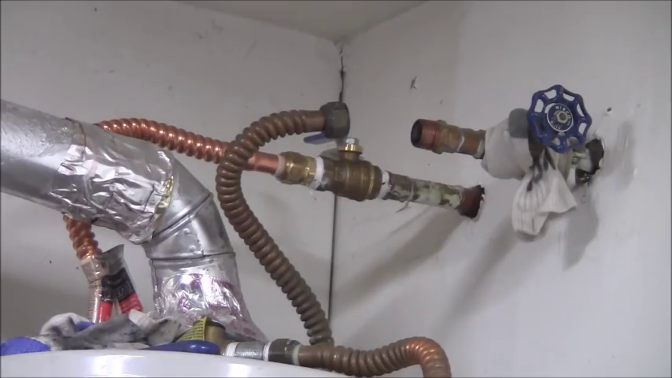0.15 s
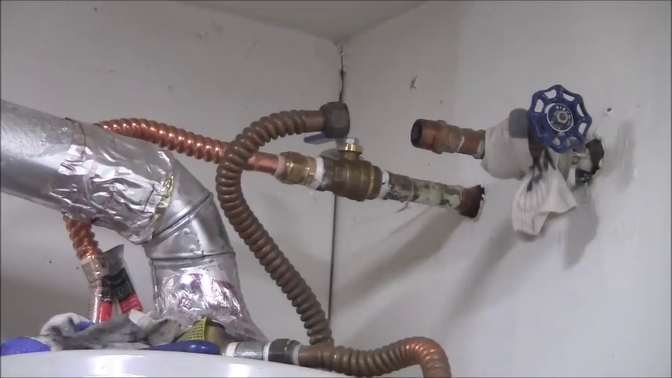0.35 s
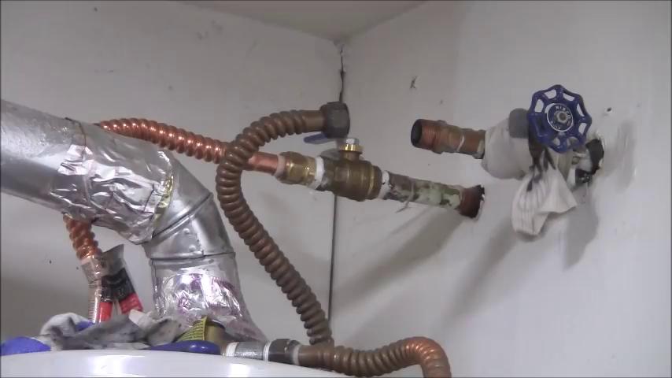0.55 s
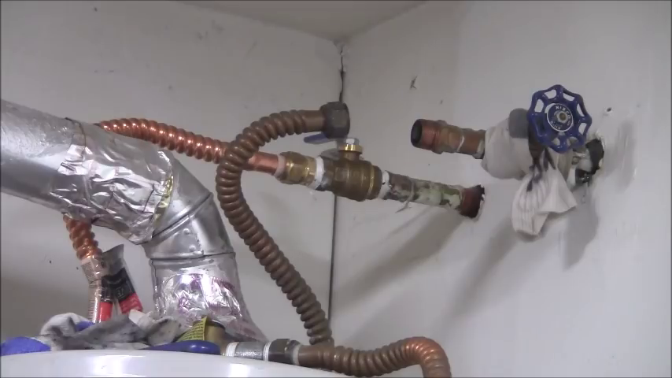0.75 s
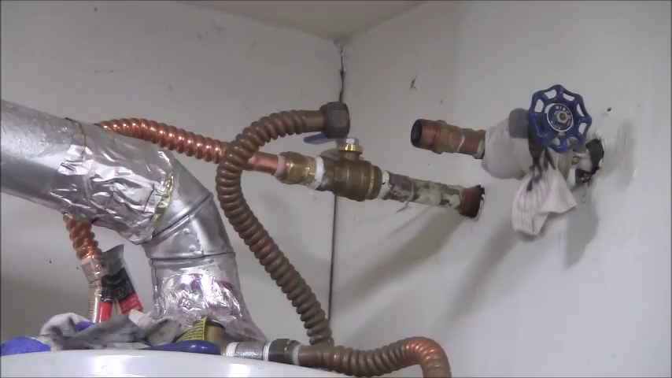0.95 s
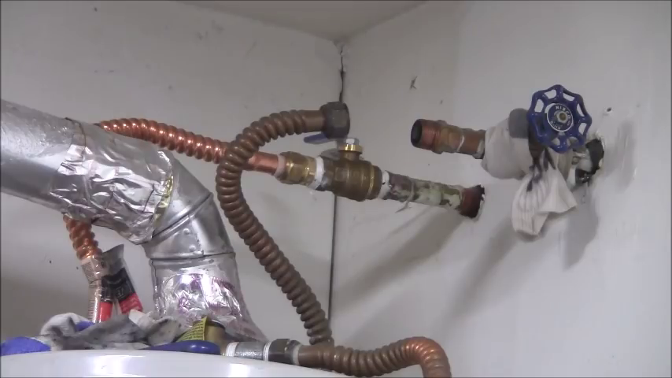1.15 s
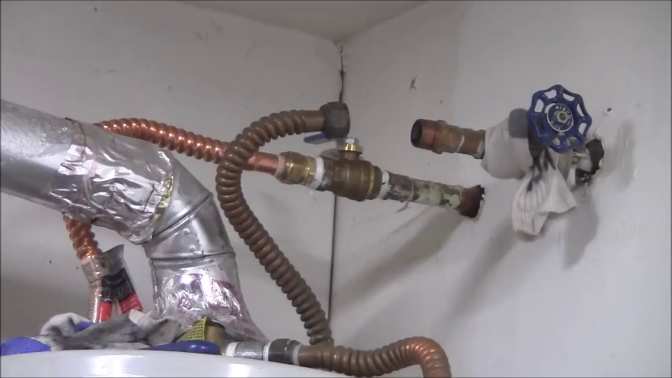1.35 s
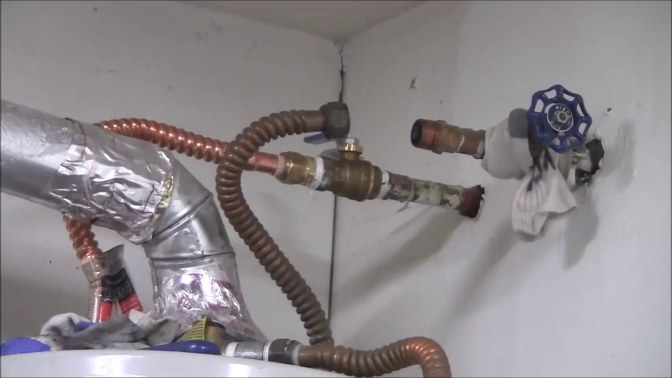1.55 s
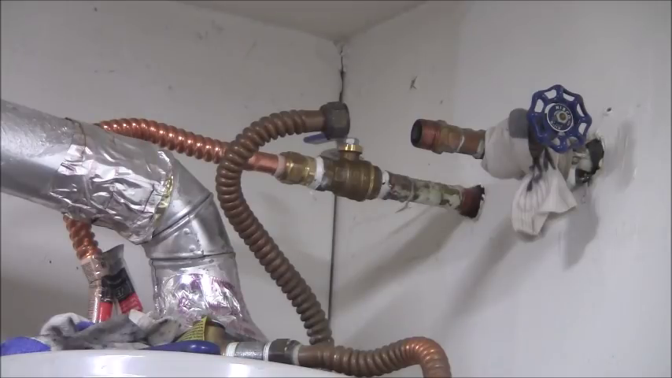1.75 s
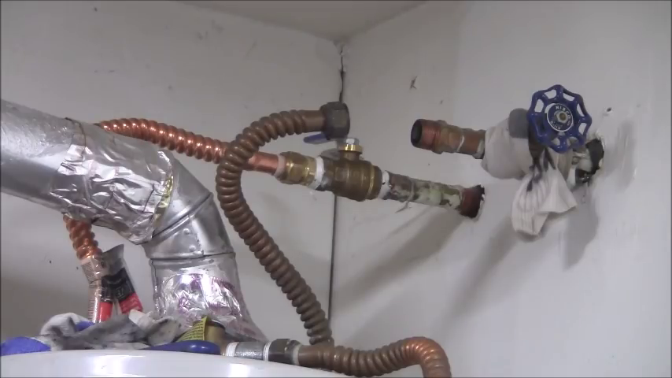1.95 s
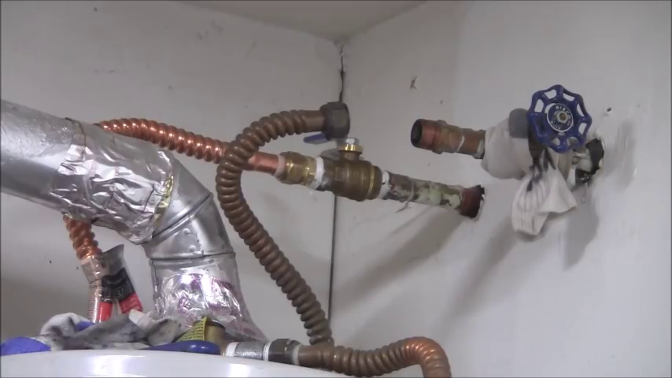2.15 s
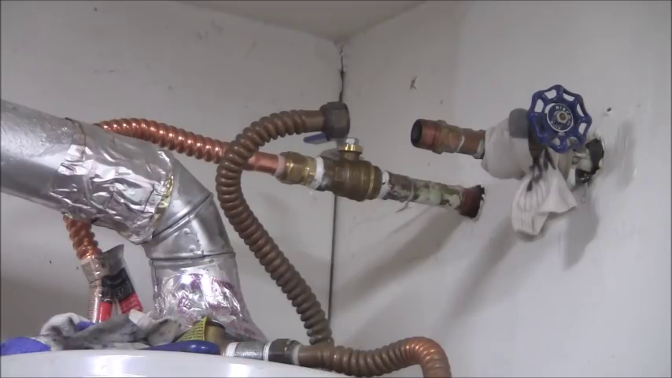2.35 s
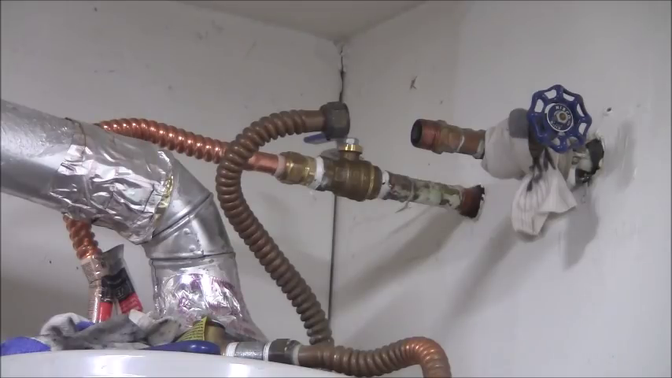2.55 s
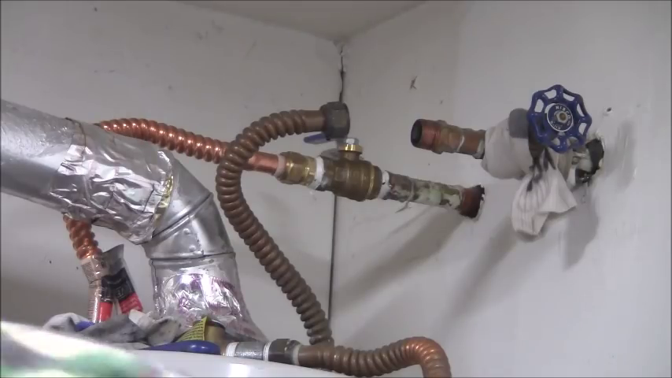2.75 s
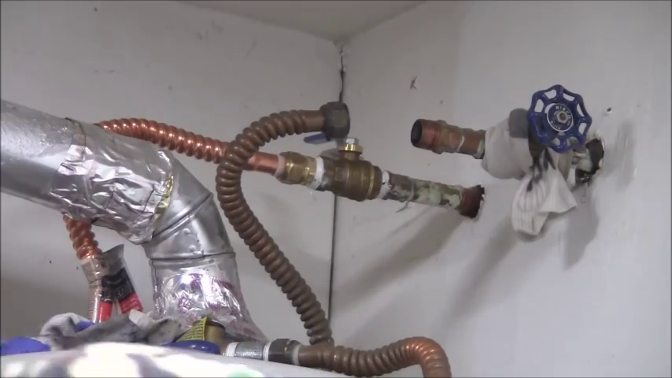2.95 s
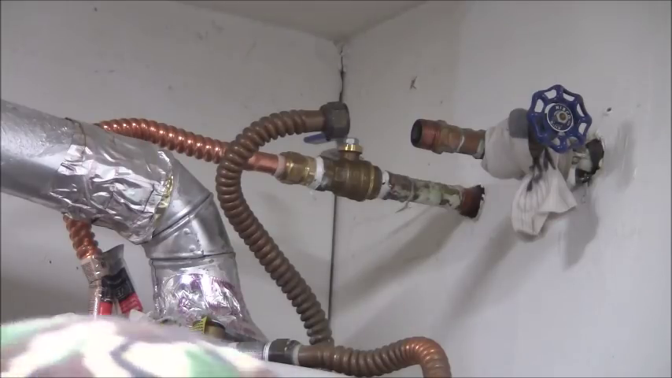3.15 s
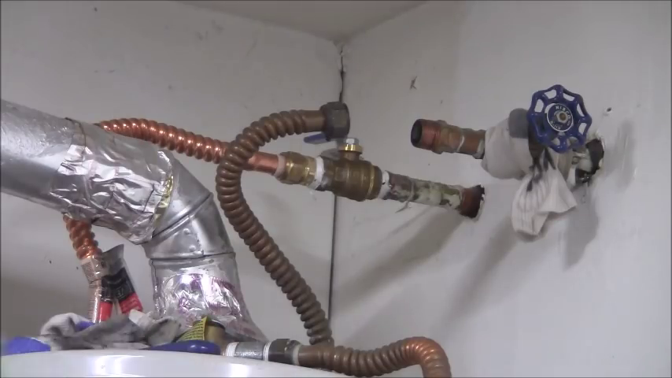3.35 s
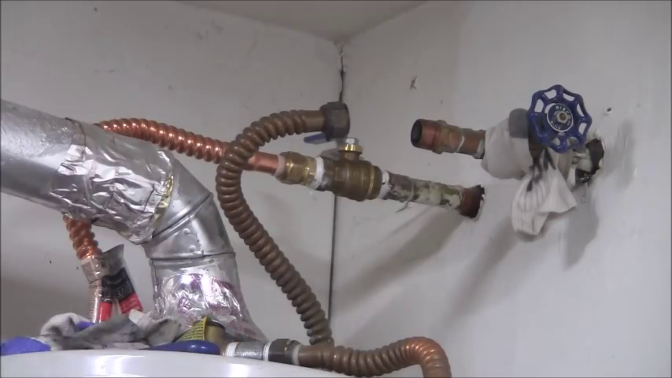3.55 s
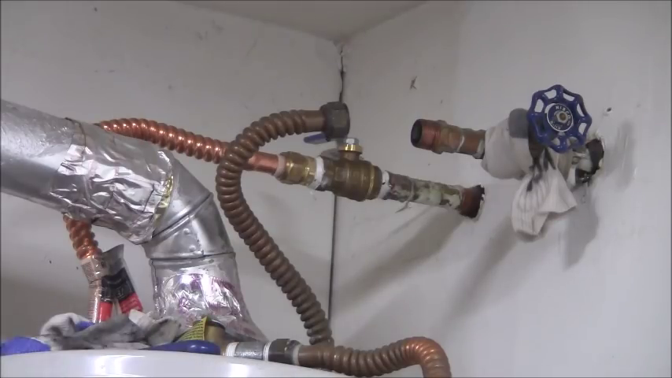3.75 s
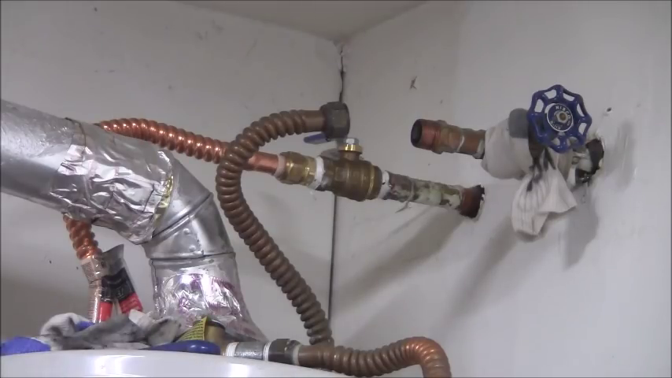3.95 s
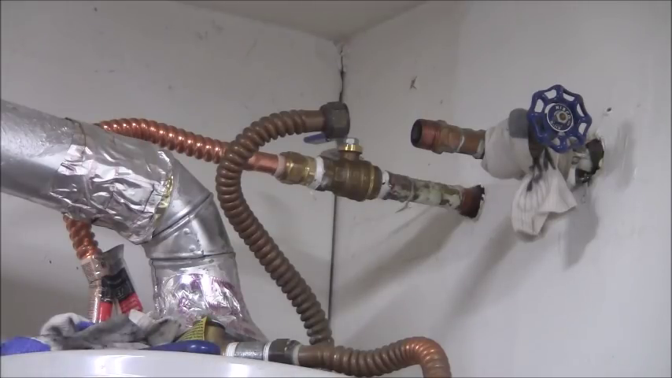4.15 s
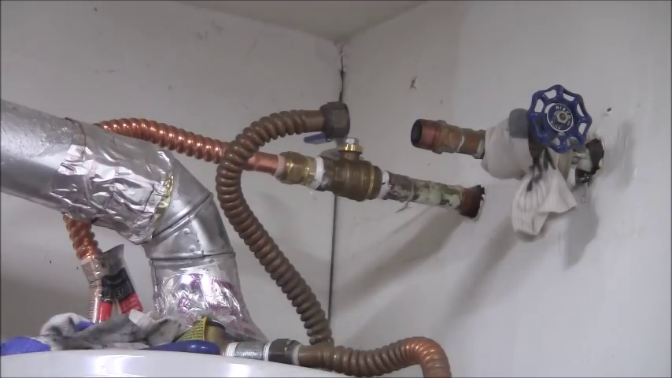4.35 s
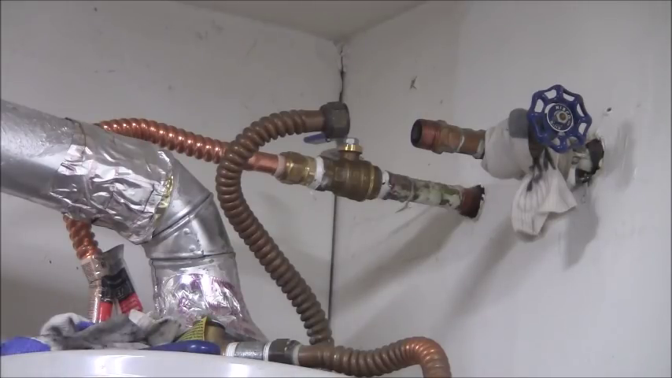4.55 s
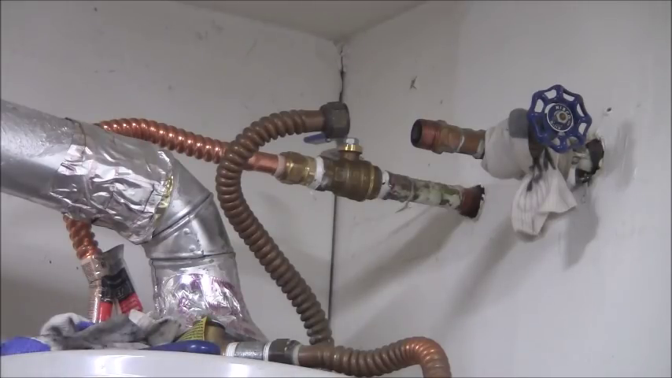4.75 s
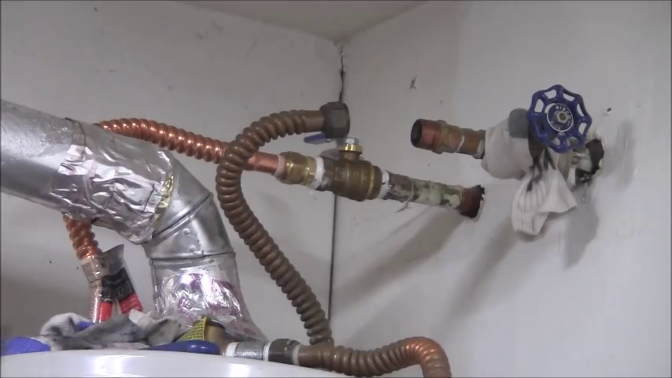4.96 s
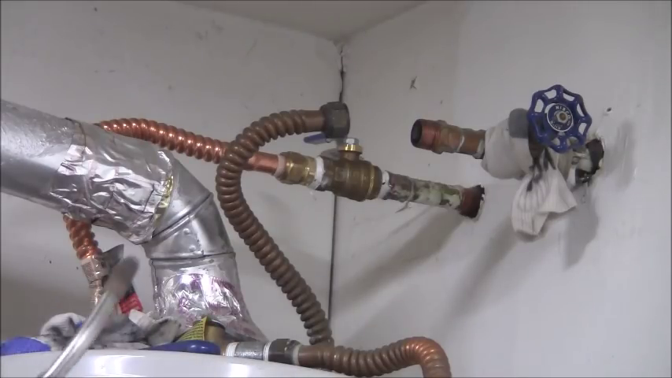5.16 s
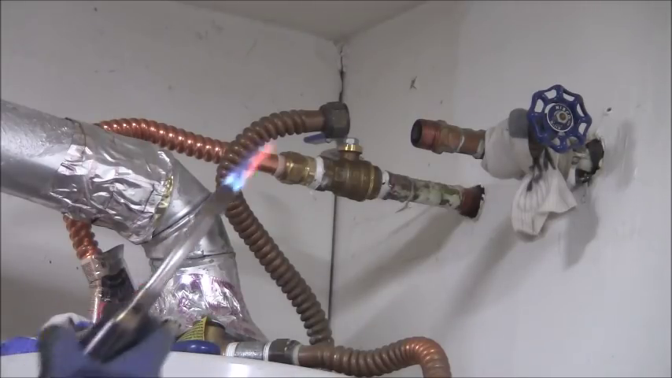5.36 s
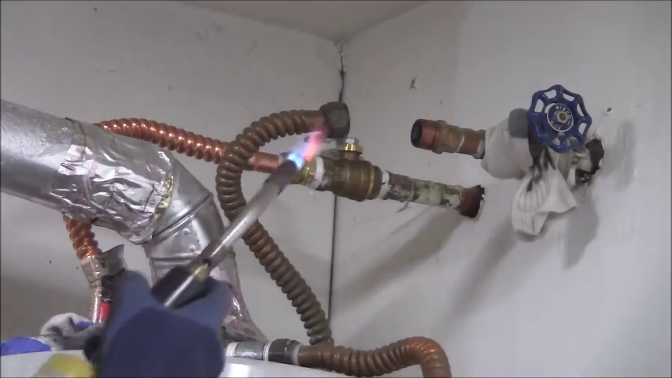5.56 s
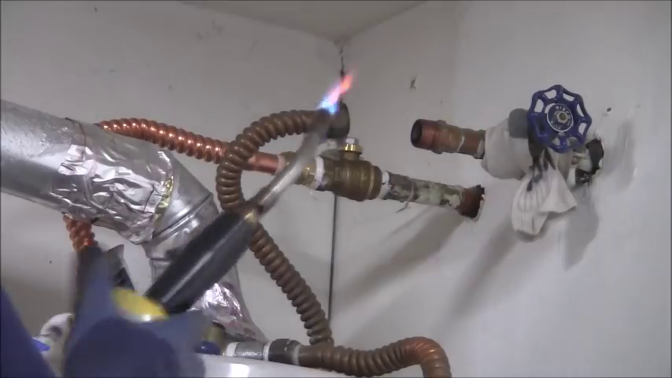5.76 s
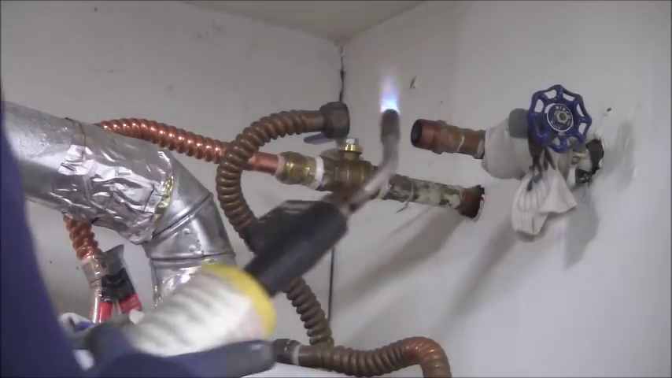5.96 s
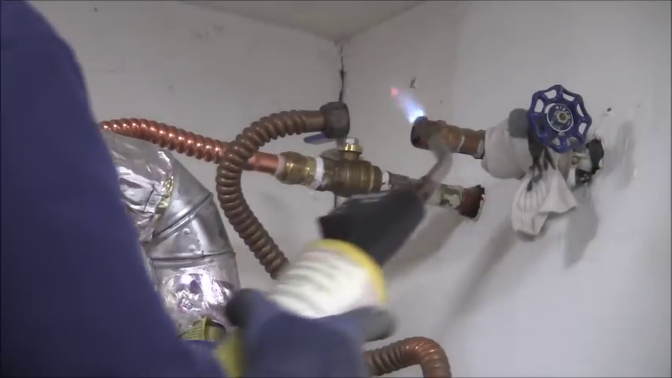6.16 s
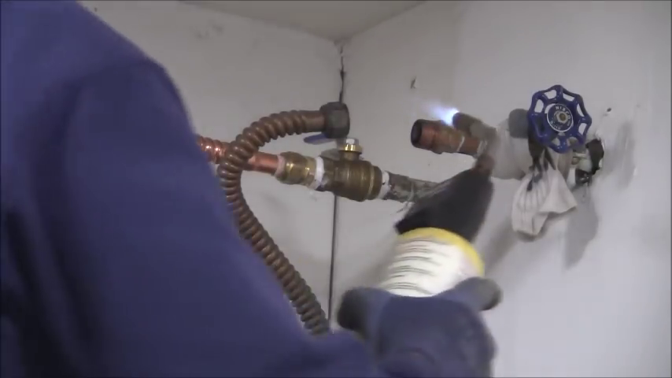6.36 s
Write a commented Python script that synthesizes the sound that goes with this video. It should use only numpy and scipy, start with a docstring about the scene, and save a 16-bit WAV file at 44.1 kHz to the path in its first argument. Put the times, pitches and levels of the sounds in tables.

```python
"""Clothes rustle over quiet air and hiss in a bare cupboard as a plumber shifts about and knocks tools.
A hollow gas cylinder is dragged in scraping jerks, a torch is tapped and its valve squeaks and hisses.
An igniter snaps: the flame pops alight with a low whump and roars while the torch moves to a copper pipe
near the wall. Noise and random clicks, shaped by spectra and resonances, make all but the squeak: a
wavering sine. A decaying noise tail adds the cupboard, and shortening delays add the walls near the flame."""
import sys
import numpy as np
from scipy import signal
from scipy.fft import rfft, irfft, next_fast_len
from scipy.io import wavfile

SR = 44100
rng = np.random.default_rng(int(sys.argv[2]) if len(sys.argv) > 2 else 0)


def master_out(mix):
    """Clip the mix to full scale and print it as 16-bit PCM to the path in sys.argv[1]."""
    frames = np.transpose(np.atleast_2d(mix))
    ceiling = np.clip(frames, -1, 1)
    pcm = np.round(ceiling * 32767).astype(np.int16)
    wavfile.write(sys.argv[1], SR, pcm)


N = 281799


def from_db(db):
    """Decibels to gain."""
    return 10 ** (np.asarray(db) / 20)


def rms_one(x):
    """Scale to rms 1."""
    return x / np.sqrt(np.mean(x ** 2) + 1e-20)


def in_time(rows):
    """Turn table columns into curves with one value a sample; the first column is time in seconds."""
    s, *columns = np.transpose(rows)
    return [np.interp(np.arange(N) / SR, s, column) for column in columns]


def at_hz(points, hz):
    """Read a spectrum in dB on a log frequency axis."""
    point_hz, point_db = np.array(points).T
    return np.interp(np.log(hz), np.log(point_hz), point_db)


def colour(x, *spectra):
    """Filter noise or clicks by the sum of spectra in dB; rms 1."""
    size = next_fast_len(N)
    hz = np.maximum(np.fft.rfftfreq(size, 1 / SR), 1)
    gain = from_db(sum(at_hz(spectrum, hz) for spectrum in spectra))
    return rms_one(irfft(rfft(x, size) * gain, size)[:N])


def drift(rate_hz):
    """Slow random wander of rms 1: noise through two equal poles, drawn every 40 samples."""
    r = np.exp(-2 * np.pi * rate_hz * 40 / SR)
    noise = rng.standard_normal(N // 40 + 2002)
    slow = signal.lfilter([1], [1, -2 * r, r * r], noise)[2000:]  # skip the filter's start
    return np.interp(np.arange(N) / 40, np.arange(len(slow)), rms_one(slow))


def resonate(x, hz, width_hz):
    """One damped resonance, about gain 1 at its peak."""
    r = np.exp(-np.pi * max(width_hz, 10) / SR)
    feed = np.array([1, 0, -1]) * (1 - r * r) / 2
    return signal.lfilter(feed, [1, -2 * r * np.cos(2 * np.pi * hz / SR), r * r], x)


def ring(x, modes):
    """Modes struck in parallel, signs alternating; rms 1."""
    total = 0
    for k, (hz, width_hz, db) in enumerate(modes):
        total = total + (-1) ** k * from_db(db) * resonate(x, hz, width_hz)
    return rms_one(total)


def grains(per_s, spread_db):
    """Random clicks of either sign and uneven size."""
    sizes_db = spread_db * np.minimum(rng.exponential(1, N), 4)
    sizes = from_db(sizes_db) * rng.choice([-1, 1], N)
    return sizes * (rng.random(N) < per_s / SR)


def swells(s, swell_s, hold_s, fade_s, db):
    """Gain of events that change 10 dB in each swell or fade time around a hold; their powers add."""
    t = np.arange(0, N + 32, 32)[:, None] / SR
    before = (s - t) / np.maximum(swell_s, 1e-4)  # a negative swell time is a sudden start
    after = (t - s - hold_s) / np.maximum(fade_s, 1e-4)
    down = np.maximum(np.maximum(before, after), 0)
    gain = np.sqrt(np.sum(from_db(db - 10 * down) ** 2, axis=1))
    return np.interp(np.arange(N) / SR, t[:, 0], gain)


def rattle(contacts, s, t60_s):
    """A firm first contact, then a dying rattle: start sample, contacts, envelope."""
    i, t = round(s * SR), np.arange(SR // 2) / SR
    dying = from_db(-60 * t / max(t60_s, .01))
    blows = contacts[i:i + len(t)] * dying
    blows[0] += 8.0
    return i, blows, dying


def later(x, ms):
    """Read the sound some milliseconds late; the delay may change in time."""
    return np.interp(np.arange(N) - ms * SR / 1000, np.arange(N), x)


def noise_band(centre_hz, width_hz):
    """Slow noise on a gliding carrier: a band of noise with a moving centre; rms 1."""
    noise = rng.standard_normal((2, len(centre_hz)))
    slow = signal.lfilter(*signal.butter(2, width_hz / 2, fs=SR), noise)
    phase = 2 * np.pi * np.cumsum(centre_hz) / SR
    return rms_one(slow[0] * np.cos(phase) + slow[1] * np.sin(phase))


# All spectra below give relative shape only.
# quiet air and hiss: frequency_hz, level_db (per Hz)
AIR_SPECTRUM = [(15, -43), (25, -5.5), (107, 5), (187, 2), (250, 5), (326, -1.5), (684, -4), (1100, -17),
                (1400, -18), (1510, -22), (1820, -17), (4370, -17.5), (9410, -18), (14000, -32.5)]
# stereo difference of the air, shape against the mid: frequency_hz, side_db
AIR_SIDE_SHAPE = [(60, -16), (110, -15.5), (200, -11.5), (370, -3), (670, -4), (1220, 5.5), (2230, -3.5),
                  (4060, -5.5), (7420, -11), (13600, -21)]
AIR_DB = -53


def room_tone():
    """Quiet air and microphone hiss: steady noise with a separate noise for the stereo side."""
    mid, side = rng.standard_normal((2, N))
    mid = colour(mid, AIR_SPECTRUM)
    side = from_db(-5.0) * colour(side, AIR_SPECTRUM, AIR_SIDE_SHAPE)
    return from_db(AIR_DB) * (mid + side * [[1], [-1]])


# soft body of rubbed cloth: frequency_hz, level_db (per Hz)
CLOTH_BODY_SPECTRUM = [(150, -13), (300, -0.5), (700, -1.5), (1500, -3), (2500, -14), (5000, -30)]
# crisp surface snaps, also the colour of grit: frequency_hz, level_db (per Hz)
CRISP_SPECTRUM = [(1180, -21), (2000, 1), (2350, 0.5), (4370, -1.5), (5670, 0), (8110, -1), (9860, -2),
                  (14000, -31)]
# clothes and gloves rub; the short one at 2.588 s is a tick leading into a tool knock:
# peak_s, swell_s, fade_s (both per 10 dB), body_db, crisp_db
RUBS_AND_TICK = [(0.101, 0.015, 0.015, -57, -56), (0.171, -0.1, 0.024, -64, -56.5),
                 (0.36, -0.1, 0.072, -64, -51), (0.4, 0.013, 0.058, -50.5, -64),
                 (0.5, -0.03, 0.084, -60, -60), (0.64, 0.046, 0.046, -57, -52),
                 (0.765, 0.038, 0.086, -53.5, -52), (0.99, .09, 0.16, -57.5, -56.5),
                 (1.13, -0.3, 0.57, -63, -56.5), (1.28, 0.013, 0.016, -45, -57),
                 (1.41, 0.042, .06, -55, -60), (1.455, 0.043, 0.028, -46.5, -48),
                 (1.5, -0.14, 0.31, -63, -61), (1.69, 0.055, .06, -59, -50),
                 (1.82, 0.068, 0.067, -48.5, -46.5), (1.92, 0.019, 0.21, -57, -56.5),
                 (2.04, 0.0076, 0.025, -57, -48.5), (2.105, 0.0083, 0.049, -62, -50),
                 (2.3, 0.01, 0.084, -53.5, -59), (2.405, 0.005, 0.16, -57, -60.5),
                 (2.54, 0.033, 0.22, -76, -69), (2.588, .008, .02, -43, -46),
                 (2.99, 0.055, 0.057, -53, -64), (3.34, 0.15, 0.013, -53, -70),
                 (3.491, 0.084, 0.011, -49.5, -59), (3.55, 0.045, 0.027, -50.5, -68),
                 (3.66, 0.022, 0.19, -55.5, -58), (3.862, 0.005, 0.014, -53, -68),
                 (3.95, 0.027, 0.15, -62, -66), (4.12, 0.04, 0.098, -52.5, -56.5),
                 (4.38, 0.013, 0.3, -66, -61), (4.62, 0.03, 0.021, -46.5, -61),
                 (4.76, 0.038, 0.045, -48, -64), (4.875, 0.035, 0.025, -52, -65)]
STIR_BODY_DB, STIR_CRISP_DB = -64.5, -71   # slight movement between the rubs


def rustle():
    """Fibres slip in dense tiny snaps, a soft body and a crisp surface; one short burst is a knock's tick."""
    s, swell_s, fade_s, body_db, crisp_db = np.transpose(RUBS_AND_TICK)
    body = swells(s, swell_s, 0, fade_s, body_db) + from_db(STIR_BODY_DB)
    crisp = swells(s, swell_s, 0, fade_s, crisp_db) + from_db(STIR_CRISP_DB)
    snaps = grains(2500.0, spread_db=0.5)
    return body * colour(snaps, CLOTH_BODY_SPECTRUM) + crisp * colour(snaps, CRISP_SPECTRUM)


# flat contact: frequency_hz, level_db (per Hz)
SLAP_SPECTRUM = [(300, -56), (700, 7.5), (1500, 7.5), (2800, 0.5), (5000, -21)]
# hard contact: frequency_hz, level_db (per Hz)
CRACK_SPECTRUM = [(1500, -21), (3000, -4), (4500, -6), (7500, -0.5), (10500, -2.5), (14000, -51)]
# knocks: start_s, strength_db, ring_hz, thud_db, slap_db, crack_db (last three
# against the ring), rattle_t60_s
TOOL_KNOCKS = [(0.092, -47, 372, -23, 1, -18, .089), (0.355, -52.5, 291, -18, 5, -5, 0.086),
               (0.388, -45.5, 497, -14, 3.5, -13, 0.064), (0.849, -48.5, 1270, -27, -8, -5, .088),
               (0.962, -50, 420, -1, 2, -2, .08), (1.011, -48.5, 1170, -21, -6, -4, .053),
               (1.126, -52, 1130, -26, 10.5, 4, 0.073), (1.175, -52.5, 280, -20, 5, 2.5, 0.073),
               (1.275, -53, 595, -20, -14, -13, .1), (1.45, -42, 1410, -24, -9, -23, .11),
               (2.035, -49, 2210, -13, 3.5, -16, 0.17), (2.098, -46.5, 1930, -9, 2, 0, 0.07),
               (2.291, -44, 244, 2, -6, -9, 0.049), (2.397, -38, 390, -14, -30, -17, 0.12),
               (2.593, -37, 365, -27, 8, 3, 0.093), (3.008, -41, 280, -1.5, -1.5, -3, 0.48),
               (3.109, -31.5, 490, -1.5, 1.5, -3.5, 0.22), (3.196, -24.5, 400, -34, -11.5, -13.5, 0.18),
               (3.23, -33.5, 486, 1.5, -36, 8, 0.026), (3.279, -45, 514, 5, 5.5, -1, 0.057),
               (3.441, -45, 255, -4, -4.5, -9.5, .12), (3.546, -41.5, 416, -9, -16, -22, 0.074),
               (3.673, -52, 370, -24, 5.5, 15.5, .15), (3.86, -43, 348, -27, -23, -42, 0.15),
               (4.075, -46, 380, -18, -3.5, -13, 0.24), (4.747, -41.5, 1330, -24, -28, -26, 0.15),
               (4.955, -44, 411, -29, 7.5, -6, 0.17)]
# the igniter snaps: columns as for a knock
IGNITER_SNAP = (5.233, -14.5, 315, -7.5, -6, -4, 0.06)
RING_DAMPING = 0.77   # width of the ring over its pitch


def knocks():
    """Each knock, and the igniter, sounds a hollow ring, a low thud, a flat slap and a bright crack."""
    out, contacts = np.zeros(N), rms_one(grains(4000.0, spread_db=3.5))
    flat, bright = colour(contacts, SLAP_SPECTRUM), colour(contacts, CRACK_SPECTRUM)
    for s, strength_db, ring_hz, thud_db, slap_db, crack_db, t60_s in TOOL_KNOCKS + [IGNITER_SNAP]:
        i, blows, dying = rattle(contacts, s, t60_s)
        span = slice(i, i + len(blows))
        width_hz = ring_hz * RING_DAMPING
        # the roots make up for the energy that a narrow resonance takes away
        hollow = resonate(resonate(blows, ring_hz, width_hz), ring_hz, width_hz) * np.sqrt(SR / width_hz)
        thud = resonate(resonate(blows, 180, 210), 156, 130.0) * np.sqrt(SR / 150)
        slap = from_db(slap_db) * flat[span] * dying
        crack = from_db(crack_db) * bright[span] * dying
        out[span] += from_db(strength_db) * (hollow + from_db(thud_db) * thud + slap + crack)
    return out


# modes of the hollow gas cylinder: pitch_hz, width_hz, level_db
CYLINDER_MODES = [(734, 200, -10.5), (940, 76, 1), (1091, 60, -1), (1520, 120, -16), (1840, 220, -13.5),
                  (2110, 110, -13), (2250, 160, -16)]
# it is dragged over a hard top in jerks: start_s, hold_s, level_db
DRAG_JERKS = [(3.027, 0.019, -16.5), (3.052, 0.053, -25.5), (3.119, 0.016, -22.5), (3.221, .01, -30)]
# grit under it scratches: peak_s, swell_s, fade_s (both per 10 dB), level_db
GRIT_SCRATCHES = [(3.028, 0.0005, 0.015, -29.5), (3.075, 0.017, 0.07, -41), (3.106, .005, 0.005, -36),
                  (3.145, .003, .008, -38), (3.158, 0.0072, 0.01, -29), (3.2, .005, 0.005, -43)]
JERK_SWELL_S, JERK_FADE_S = 0.0012, 0.0076


def cylinder():
    """Stick-slip jolts ring the shell; grit scratches in sparse snaps."""
    s, hold_s, db = np.transpose(DRAG_JERKS)
    jerk_gain = swells(s, JERK_SWELL_S, hold_s, JERK_FADE_S, db)
    s, swell_s, fade_s, db = np.transpose(GRIT_SCRATCHES)
    grit_gain = swells(s, swell_s, 0, fade_s, db)
    jolts = signal.lfilter(*signal.butter(2, 1500, fs=SR), grains(4000.0, spread_db=3.0))
    grit = colour(grains(1500.0, spread_db=-3.5), CRISP_SPECTRUM)
    return jerk_gain * ring(jolts, CYLINDER_MODES) + grit_gain * grit


# metal modes of the torch: pitch_hz, width_hz, level_db
TORCH_MODES = [(478, 210, 4.5), (766, 150, 0), (1020, 110, 10.5), (1870, 370, -6), (2230, 180, -38),
               (2650, 88, 1.5), (3650, 130, -13.5), (4800, 70, -5.5), (5860, 80, -24), (7700, 130, -14),
               (7620, 79, -27), (8600, 190, -17)]
# loose parts: frequency_hz, level_db (per Hz)
CLATTER_SPECTRUM = [(200, -22), (450, -8), (1000, -2.5), (2200, -3), (4000, -12.5), (7500, -15),
                    (10500, -18), (14000, -60)]
# taps on the torch: start_s, ring_db, brightness_db (per octave above 1 kHz), clatter_db, rattle_t60_s
TORCH_TAPS = [(4.4, -38.5, 4.5, -22, 0.069), (4.408, -47, -7, -22.5, 0.087), (4.43, -44.5, -8, -33, 0.21),
              (4.508, -70, 11, -34.5, 0.12), (4.521, -53, 8, -37.5, 0.2)]


def torch():
    """Taps ring the same metal modes, a harder contact favours the high ones; loose parts clatter along."""
    out, contacts = np.zeros(N), rms_one(grains(6000.0, spread_db=2.0))
    loose = colour(contacts, CLATTER_SPECTRUM)
    for s, ring_db, bright_db, clatter_db, t60_s in TORCH_TAPS:
        i, blows, dying = rattle(contacts, s, t60_s)
        span = slice(i, i + len(blows))
        modes = [(hz, width_hz, db + bright_db * np.log2(hz / 1000)) for hz, width_hz, db in TORCH_MODES]
        clatter = from_db(clatter_db) * loose[span] * dying
        out[span] += from_db(ring_db) * ring(blows, modes) + clatter
    return out


# valve spindle squeaks: start_s, hold_s, pitch_hz, level_db
VALVE_SQUEAKS = [(4.53, 0.061, 1168, -40), (4.623, 0.036, 1159, -42.5), (4.7, 0.029, 1157, -52),
                 (4.76, .01, 1165, -64), (4.84, 0.034, 1156, -48.5)]
SQUEAK_SWELL_S, SQUEAK_FADE_S = .015, 0.021


def valve():
    """The spindle sticks and slips at one mode of the metal: a sine wavering in pitch and level."""
    s, hold_s, hz, db = np.transpose(VALVE_SQUEAKS)
    pitch_hz = np.interp(np.arange(N) / SR, s + hold_s / 2, hz)
    phase = 2 * np.pi * np.cumsum(pitch_hz + 4 * drift(25)) / SR
    gain = swells(s, SQUEAK_SWELL_S, hold_s, SQUEAK_FADE_S, db) * from_db(1.5 * drift(20))
    return np.sqrt(2) * gain * np.sin(phase)


# gas jet: frequency_hz, level_db (per Hz)
JET_SPECTRUM = [(150, -39), (250, -13), (813, -3), (978, 3), (1390, -11.5), (2160, -9), (2690, -9),
                (4760, -13), (7020, -12.5), (9830, 0.5), (14000, -28)]
# burner tube resonances: pitch_hz, width_hz, level_db (per 100 Hz of width)
TUBE_MODES = [(1050, 140, -5), (2147, 42, 5), (3410, 52, 0), (4750, 210, -5), (5560, 250, -3),
              (6180, 220, -6)]
GAS_OPEN_S, GAS_FULL_S = 4.875, 4.95   # valve opens, full flow reached
GAS_SWELL_S, GAS_DB = 0.081, -41.5   # swell time per 10 dB, level of the jet


def gas():
    """Smooth jet noise blows the pipe modes of the burner tube, each wavering in level."""
    jet, modes = rng.standard_normal(N), 0
    for hz, width_hz, db in TUBE_MODES:
        gain = from_db(db + 2.0 * drift(12)) * np.sqrt(width_hz / 100)
        modes = modes + gain * rms_one(resonate(jet, hz, width_hz))
    opening = np.clip((np.arange(N) / SR - GAS_OPEN_S) / .015, 0, 1)
    flow = swells(GAS_FULL_S, GAS_SWELL_S, N / SR, 1, GAS_DB) * opening  # held to the end
    return flow * (colour(jet, JET_SPECTRUM) + from_db(-6.5) * rms_one(modes))


# turbulent roar: frequency_hz, level_db (per Hz)
ROAR_SPECTRUM = [(29, -58), (50, -45), (141, -24), (184, -25), (256, -15.5), (539, -11), (598, -11),
                 (867, -11.5), (1450, -11), (1860, -14.5), (3610, -20.5), (3920, -23), (7000, -36),
                 (9100, -42), (15400, -120)]
# bright jet edge: frequency_hz, level_db (per Hz)
EDGE_SPECTRUM = [(2650, -12.5), (4500, 1.5), (5440, -6.5), (7030, -4), (7660, -2), (10000, -3.5),
                 (13000, -24), (14000, -34)]
# flame over time: time_s, flame_db, hot_tube_hz, hot_tube_db (against the flame)
FLAME_COURSE = [(5.236, -11, 1290, 3), (5.252, -8.5, 1347, -9), (5.424, -11, 1449, -7.5),
                (5.65, -10.5, 1486, -6), (5.88, -10, 1578, -12), (6.168, -11, 1330, -11.5),
                (6.184, -9.5, 1290, -6), (6.27, -11, 1495, -8.5), (6.39, -11.5, 1532, -3.5)]
# echo off the nearest wall as the torch closes in: time_s, delay_ms
WALL_ECHO_COURSE = [(5.25, 1.2), (5.45, .95), (5.75, 0.79), (6.0, 0.59), (6.2, 0.619), (6.39, 0.6)]
LIT_S, WALL_ECHO_DB, TUBE_WIDTH_HZ = 5.234, -14, 230
EDGE_DB, FLASH_DB, FLASH_S = -12.5, 16, 0.006   # the edge flashes up at ignition; the extra dB fall by 1/e
WHUMP_DB, WHUMP_HZ, WHUMP_T60_S = -15, 246, 0.28
RUMBLE_DB, RUMBLE_HZ, RUMBLE_T60_S = -37, 76.4, 0.88   # a deep rumble outlasts the whump


def flame():
    """Turbulent burning: roar, bright edge and hot tube resonance, shifting echoes, a whump at ignition."""
    flame_db, tube_hz, tube_db = in_time(FLAME_COURSE)
    t = np.arange(N) / SR - LIT_S
    lit_s = np.maximum(t, 0)
    edge_db = EDGE_DB + FLASH_DB * np.exp(-lit_s / FLASH_S)
    roar = colour(rng.standard_normal(N), ROAR_SPECTRUM)
    edge = colour(rng.standard_normal(N), EDGE_SPECTRUM)
    burn = from_db(drift(29)) * roar + from_db(edge_db + 1.2 * drift(30)) * edge
    # paths by way of the walls shorten as the torch moves into the corner: start delay, share lost a second
    for ms, pace in rng.uniform([2, -.35], [14, -.1], (7, 2)):
        reflected = signal.lfilter(*signal.butter(1, 500, "high", fs=SR), burn)
        burn = burn + .2 * later(reflected, ms * (1 + pace * lit_s))
    burn = burn + from_db(WALL_ECHO_DB) * later(burn, in_time(WALL_ECHO_COURSE)[0])
    tube = from_db(tube_db + 1.3 * drift(11)) * noise_band(tube_hz, TUBE_WIDTH_HZ)
    burn = rms_one(burn) + tube
    # the gas cloud that gathered burns off in one low whump
    whump = rms_one(resonate(resonate(rng.standard_normal(N), WHUMP_HZ, 190), WHUMP_HZ, 200))
    whump = whump * from_db(WHUMP_DB - 60 * lit_s / WHUMP_T60_S)
    rumble = rms_one(resonate(resonate(rng.standard_normal(N), RUMBLE_HZ, 50), RUMBLE_HZ, 50))
    rumble = rumble * from_db(RUMBLE_DB - 60 * lit_s / RUMBLE_T60_S)
    onset = np.clip(t / 0.00074, 0, 1)
    return onset * (from_db(flame_db) * rms_one(burn) + whump + rumble)


ROOM_T60_S, ROOM_DB, ROOM_SIDE_DB, WALL_HZ = 0.42, -6.5, -24, 3900   # above WALL_HZ the tail dies faster


def cupboard(x):
    """Dense reflections off bare walls, duller with time: the stereo mid and the side."""
    t = np.arange(SR // 2) / SR
    noise = rng.standard_normal((2, len(t)))
    dull = signal.lfilter(*signal.butter(1, WALL_HZ, fs=SR), noise)
    tail = dull + (noise - dull) * from_db(-60 * t / 0.7)
    tail = tail * from_db(-60 * t / ROOM_T60_S) * (t > .002)
    return signal.fftconvolve(x[None], tail / np.sqrt(np.sum(tail[0] ** 2)), axes=1)[:, :N]


def scene():
    """Everything sounds in the cupboard; flame and squeak are near and get less of its mid reflections."""
    handling = rustle() + knocks() + cylinder() + torch() + gas()
    squeak, burning = valve(), flame()
    mid, side = cupboard(handling + from_db(-8) * (burning + squeak))
    side = side + cupboard(burning)[1]  # the flame spreads wider
    room = from_db(ROOM_DB) * mid + from_db(ROOM_SIDE_DB) * side * [[1], [-1]]
    return handling + squeak + burning + room + room_tone()


CUTOFF_HZ = 15000   # 40 dB down from here up


def record(dry):
    """Bass roll-off, a stereo matrix that widens the very top, a duller left port, rounded peaks, top cut."""
    ports = signal.sosfilt(signal.butter(2, 60, "high", fs=SR, output="sos"), dry)
    very_top = signal.butter(6, 11800, "high", fs=SR, output="sos")
    side = signal.sosfilt(very_top, ports[0] - ports[1])
    ports = ports + from_db(16) * side * [[1], [-1]]
    dull = signal.lfilter(*signal.butter(2, 13000, fs=SR), ports[0])
    ports[0] = 0.58 * ports[0] + 0.42 * dull
    rounded = .9 * np.tanh(ports / .9)
    return signal.sosfilt(signal.cheby2(10, 40, CUTOFF_HZ, fs=SR, output="sos"), rounded)


dry = scene()
out = record(dry)
master_out(out)
```